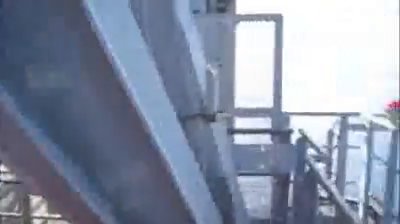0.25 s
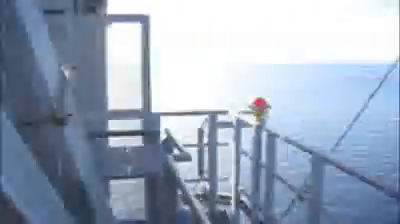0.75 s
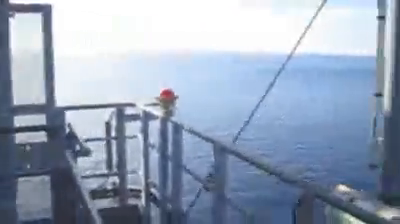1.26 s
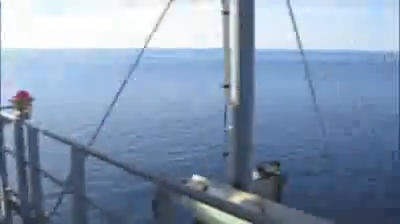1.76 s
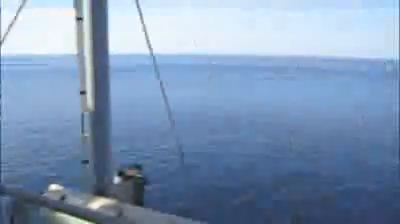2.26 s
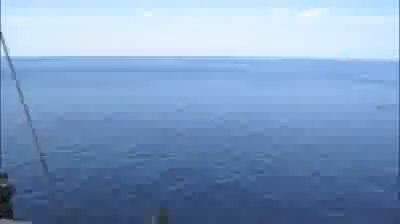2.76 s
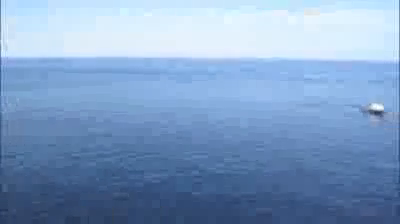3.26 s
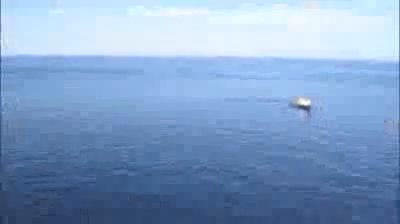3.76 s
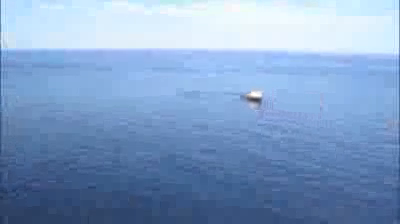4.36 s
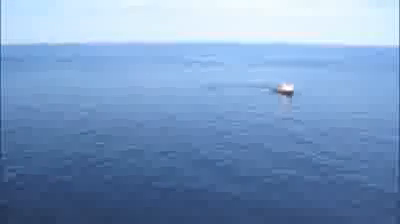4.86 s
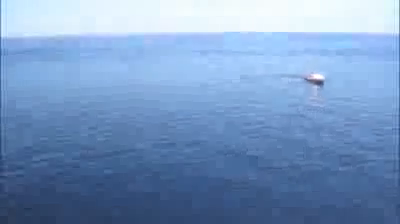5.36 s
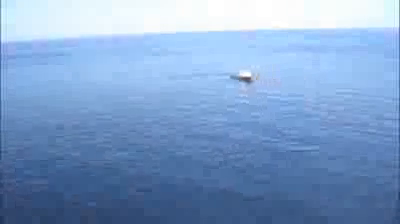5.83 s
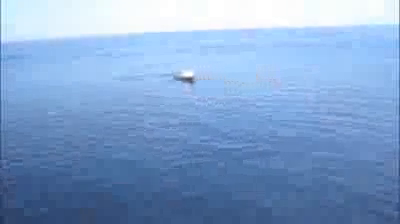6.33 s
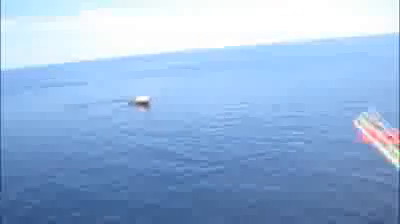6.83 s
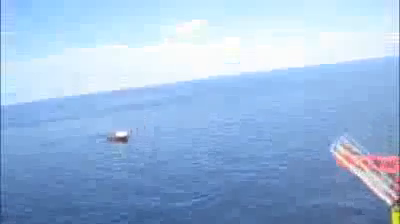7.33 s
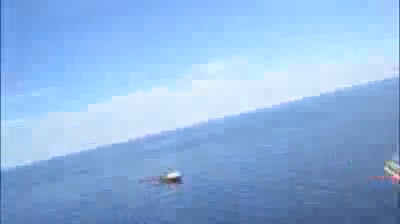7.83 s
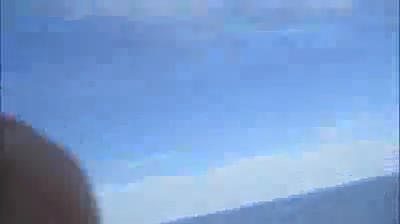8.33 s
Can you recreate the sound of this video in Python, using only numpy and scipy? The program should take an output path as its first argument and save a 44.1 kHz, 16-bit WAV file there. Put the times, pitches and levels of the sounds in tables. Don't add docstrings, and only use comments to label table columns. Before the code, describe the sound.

A thick low drone fills the whole stretch, swelling and thinning about every two seconds as two fans beat together. Under it are engine and motor hums and a rumbling steel deck; above, airy exhaust and pump hiss pulsing faster. Faint squeals appear midway and late. Close hard clicks and finger friction on the microphone's case come in the last seconds. Outdoors, rough small-device quality, with no distinct water sound.

```python
import sys
import numpy as np
from scipy import signal
from scipy.fft import rfft, irfft, next_fast_len
from scipy.io import wavfile
from scipy.ndimage import uniform_filter1d

SR = 44100
rng = np.random.default_rng(int(sys.argv[2]) if len(sys.argv) > 2 else 0)


def voltage_ratio(level):
    return 10 ** (np.asarray(level, float) / 20)


def dump_mix(stems):
    frames = np.atleast_2d(stems).T
    limited = np.clip(frames, -1, 1)
    pcm = np.round(limited * 32767).astype(np.int16)
    wavfile.write(sys.argv[1], SR, pcm)


N = 378819


def clock():
    return np.arange(N) / SR


def rms_one(x):
    return x / np.sqrt(np.mean(x ** 2) + 1e-20)


def drift(rate_hz):
    every = 40
    pole = np.exp(-2 * np.pi * every * rate_hz / SR)
    noise = rng.standard_normal(N // every + 2002)
    slow = signal.lfilter([1], [1, -2 * pole, pole ** 2], noise)[2000:]
    return np.interp(np.arange(N) / every, np.arange(len(slow)), rms_one(slow))


def tone(turns):
    return np.sqrt(2) * np.sin(2 * np.pi * turns)


def coloured(spectrum, flicker_db):
    size = next_fast_len(N)
    hz, db = np.transpose(spectrum)
    log_hz = np.log(np.fft.rfftfreq(size, 1 / SR) + 1)
    shape = voltage_ratio(np.interp(log_hz, np.log(hz), db, left=-80, right=-80))
    noise = irfft(rfft(rng.standard_normal(size)) * shape, size)[:N]
    return rms_one(noise * voltage_ratio(flicker_db * drift(9)))


def whistle(hz, db, core_hz, skirt_hz, skirt_db):
    blur = [drift(core_hz) + voltage_ratio(skirt_db) * drift(skirt_hz) for side in range(2)]
    turns = np.cumsum(hz) / SR
    return voltage_ratio(db) * rms_one(blur[0] * tone(turns) + blur[1] * tone(turns + 1 / 4))


# (harmonic, fan [-1 slow, +1 fast],
# level [dB rms], time faced [s], loss in turning [dB/s])
FAN_TONES = [
    (1, -1, -27, 2.3, 0.55),
    (1, 1, -27, 8.3, 0.65),
    (2, -1, -31.5, 6.3, 1.64),
    (2, 1, -33, 6.5, 0.55),
    (3, -1, -38.5, 5.5, 2),
]


def fans(blade_hz=206.8, waver_db=1.8):
    t, out = clock(), 0
    since = t - 5.02
    slip = since / 1.79 + .0055 * since ** 2 + .5
    node_db = -8 * np.exp(-((t - 7.8) / .36) ** 2)
    for harmonic, fan, db, facing, loss in FAN_TONES:
        k, fan = round(harmonic), np.sign(fan)
        second = k == 2
        path = second * fan * .07 * (t - 4.6) / 2
        level_db = db - loss * np.abs(t - facing) + second * node_db + waver_db * drift(1.8)
        out = out + voltage_ratio(level_db) * tone(k * (blade_hz * t + fan * slip / 2) - path)
    return out


def steady_hum(hz, db, waver_db=1.64, waver_turns=0.065):
    level = voltage_ratio(db + waver_db * drift(0.26))
    return level * tone(hz * clock() + rng.random() + waver_turns * drift(.4))


ORDER_NUMBERS = [2, 5, 7, 9, 10, 11, 12, 14, 19, 72]
ORDER_DB = [-60.5, -55.5, -48, -43.5, -49, -53.5, -46, -34.5, -45, -56]


def generator(cycle_hz=7.497):
    return sum(steady_hum(k * cycle_hz, db) for k, db in zip(ORDER_NUMBERS, ORDER_DB))


HUM_HZ = [29.86, 45.81, 59.5, 84.87, 121.1, 127.3, 135.8, 160.42, 233.0, 327.5, 473.9, 531.5, 621.1]
HUM_DB = [-43, -45, -50, -37, -45, -45, -44, -37.5, -48, -44, -42, -52, -50]


def motors():
    return sum(steady_hum(hz, db) for hz, db in zip(HUM_HZ, HUM_DB))


def panel(hz=269.75, beat_s=5.5):
    t = clock() - 2.2
    pair = tone(hz * t) + voltage_ratio(-0.5) * tone(hz * t + t / beat_s)
    return voltage_ratio(-36.5 - 1.4 * np.maximum(t, 0) + 0.74 * drift(1.5)) * pair


# (time [s], peak level [dB], ring [Hz], snap [Hz], length [s])
TICKS = [
    (5.3517, -19.5, 2600, 3300, .0004),
    (6.8662, -25, 2040, 3300, .0007),
    (7.0294, -11.5, 5500, 7600, .0008),
    (7.5651, -17.5, 3600, 6200, .0008),
    (7.7194, -29, 3500, 5000, .0015),
    (7.7537, -27, 1900, 3400, .0008),
]


def ticks():
    out, t = np.zeros(N), np.arange(400) / SR
    shell = voltage_ratio(-7) * np.sin(2 * np.pi * 1800 * t)
    for s, db, ring_hz, snap_hz, length in TICKS:
        age = t / length
        settling = 1 - .3 * np.tanh(age / 3)
        ring = np.sin(2 * np.pi * ring_hz * t * settling) + shell
        snap_level = voltage_ratio(min(db + 20.5, 6))
        snap = snap_level * np.sin(2 * np.pi * snap_hz * t) * np.exp(-age * 2.2)
        snap[:3] += voltage_ratio(2) * np.array([1, 0, -1])
        at = round(s * SR)
        out[at:at + len(t)] -= voltage_ratio(db) * (ring * age * np.exp(1 - age ** 1.5) + snap)
    return out


def gain_control(peak_s=.09):
    late = [np.maximum(clock() - s, 0) / peak_s for s, db, *_ in TICKS if db > -14]
    return voltage_ratio(sum(-1.3 * a * np.exp(1 - a) for a in late))


# (frequency [Hz], level [dB per Hz])
RUB = [(3500, -17.5), (5000, 2), (6300, 1.5), (7500, -5.5), (8400, 0), (9000, -28)]


def rustle(start_s=7.57, length_s=.22):
    done = (clock() - start_s) / length_s
    db = np.where(done < 1, -46.5 - 2.5 * done, -54)
    return uniform_filter1d(voltage_ratio(db) * (done > 0), size=1000) * coloured(RUB, flicker_db=0.5)


# (time [s], level [dB])
EXPOSURE = [(0.0, -38.5), (1.34, -40.5), (1.72, -38), (2.03, -40.5), (3.66, -39), (5.74, -40), (6.22, -44),
            (6.94, -39), (7.15, -39), (7.58, -38), (7.94, -39), (8.59, -36.5)]


def exposure():
    s, open_db = np.transpose(EXPOSURE)
    db = np.interp(clock(), s, open_db)
    return db - db.mean()


STROKES = [0.99, 0.66, 1, .9, 1.1, .7, 1.1, .6, .9, .6, 1.1, 1.3, 1.3, .9]


def pump_puffs(stroke_s=.651, first_s=.34):
    strokes = (clock() - first_s) / stroke_s
    return np.cos(np.pi * strokes) ** 4 * np.take(STROKES, np.round(strokes).astype(int).clip(0))


# (frequency [Hz], level [dB per Hz])
RUMBLE = [(15, -18), (30, -10), (60, -6), (100, 0.5), (150, -0.5), (250, -2), (400, -3), (600, -7),
          (1000, -11), (1250, -13), (1500, -24), (2200, -38.5)]


def deck_rumble(gust):
    return voltage_ratio(-24.5 + .5 * exposure() + 0.32 * gust) * coloured(RUMBLE, flicker_db=0.16)


# (frequency [Hz], level [dB per Hz])
RUSH = [(900, -25), (1400, 1), (2050, 0.5), (2500, -6.5), (3200, -27.5)]


def exhaust_rush(gust, puff):
    return voltage_ratio(-42 + exposure() + .7 * gust + 1.8 * puff) * coloured(RUSH, flicker_db=.5)


# (frequency [Hz], level [dB per Hz])
HISS = [(1800, -19.5), (2600, 2), (3500, 1.35), (4500, -4.5), (5500, -7.5), (6500, -10), (7500, -11.5),
        (8300, -13), (9000, -29.5)]


def pump_hiss(gust, puff):
    return voltage_ratio(-46 + .8 * exposure() + .5 * gust + 2.9 * puff) * coloured(HISS, flicker_db=0.96)


def roar():
    gust, puff = drift(2.5), pump_puffs()
    return deck_rumble(gust) + exhaust_rush(gust, puff) + pump_hiss(gust, puff)


# (pitch [Hz], rise [Hz/s], level [dB rms], core width [Hz], skirt width [Hz])
TURBOS = [
    (7118, 1.1, -53, 18, 129),
    (8028, 13, -59.5, 70, 200),
]


def turbochargers():
    out = 0
    for hz, rise, db, core_hz, skirt_hz in TURBOS:
        pitch = hz + rise * clock() + 10 * drift(.5)
        level_db = db + .6 * exposure() + 0.77 * drift(1.1)
        out = out + whistle(pitch, level_db, core_hz, skirt_hz, skirt_db=-4)
    return out


# (time [s], length [s], pitch [Hz], level [dB rms])
SQUEALS = [
    (3.408, 0.26, 5530, -58),
    (3.957, 0.46, 1320, -44.5),
    (7.224, 0.48, 5640, -61),
    (7.238, 0.48, 7180, -45.5),
    (8.08, 0.32, 2070, -48.5),
]


def squeals():
    t, out = clock(), 0
    for s, length, hz, db in SQUEALS:
        swell = np.sin(np.pi * np.clip((t - s) / length, 0, 1))
        out = out + swell * whistle(np.full(N, hz), db, core_hz=2.2, skirt_hz=42.0, skirt_db=-10.5)
    return out


def scene():
    machines = fans() + generator() + motors() + panel() + roar() + turbochargers() + squeals()
    return (gain_control() * (machines + ticks() + rustle()))[None]


# (frequency [Hz], step [dB])
STEP = [(300, 3), (2500, 5.5), (4500, 10.5), (6000, 9), (7500, 9.5), (8300, 10)]


def coarse_device(x, scatter_db=0.88):
    hop, start, top_line = 1152, 105, 438
    n, line = np.arange(2 * hop)[:, None] + .5, np.arange(top_line) + .5
    window = np.sin(np.pi * n / hop / 2)
    basis = np.sqrt(2 / hop) * window * np.cos(np.pi / hop * (n + hop / 2) * line)
    lead = 2 * hop - start
    blocks = np.pad(x, (lead, 3 * hop - (N + lead) % hop)).reshape(-1, hop)
    lines = np.hstack([blocks[:-1], blocks[1:]]) @ basis
    typical = np.exp(np.mean(np.log(np.abs(lines) + 1e-9), axis=1, keepdims=True))
    hz, db = np.transpose(STEP)
    step_db = np.interp(line * SR / hop / 2, hz, db) + scatter_db * rng.standard_normal(typical.shape)
    step = typical * voltage_ratio(step_db)
    kept = np.sign(lines) * step * np.floor((np.abs(lines) / step) ** .75 + .4054) ** (4 / 3)
    halves = kept @ basis.T
    return (halves[1:, :hop] + halves[:-1, hop:]).ravel()[lead - hop:][:N]


def band_limit(x):
    return signal.sosfilt(signal.butter(12, 9080, fs=SR, output="sos"), x)


def record(dry):
    mix = coarse_device(dry[0])[None]
    return band_limit(mix)


dry = scene()
out = record(dry)
dump_mix(out)
```